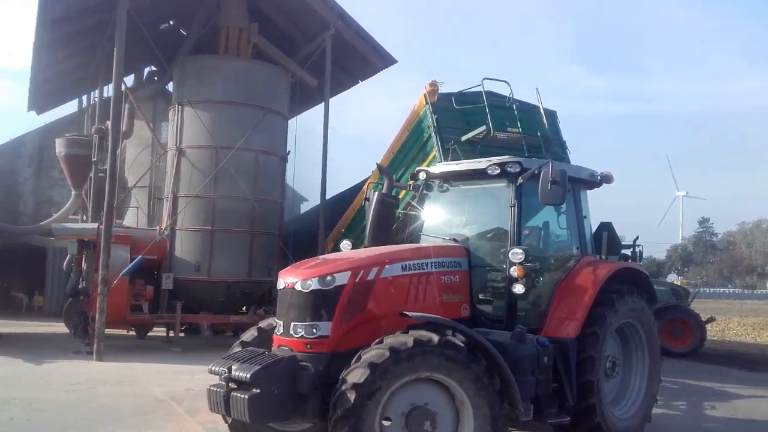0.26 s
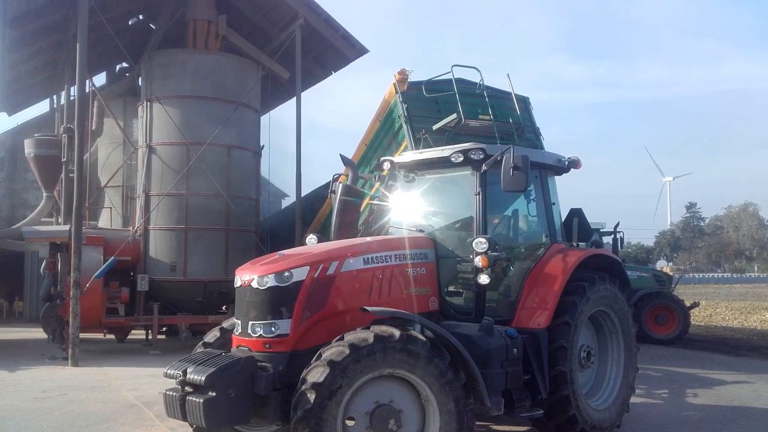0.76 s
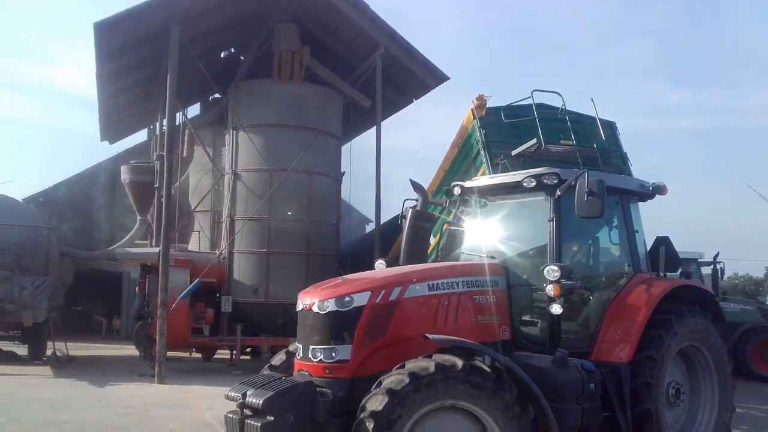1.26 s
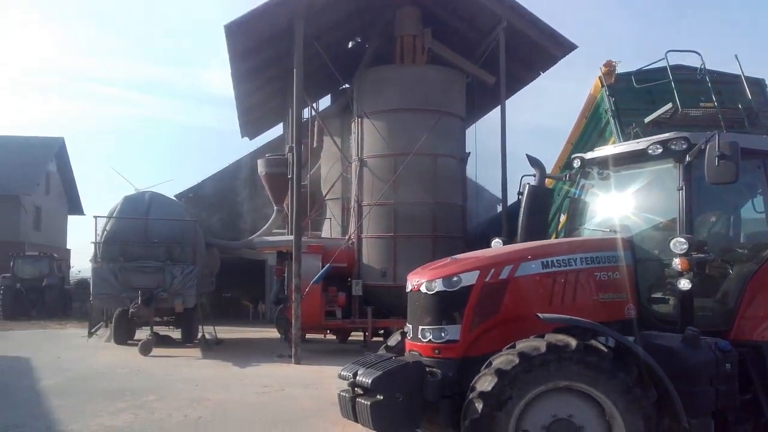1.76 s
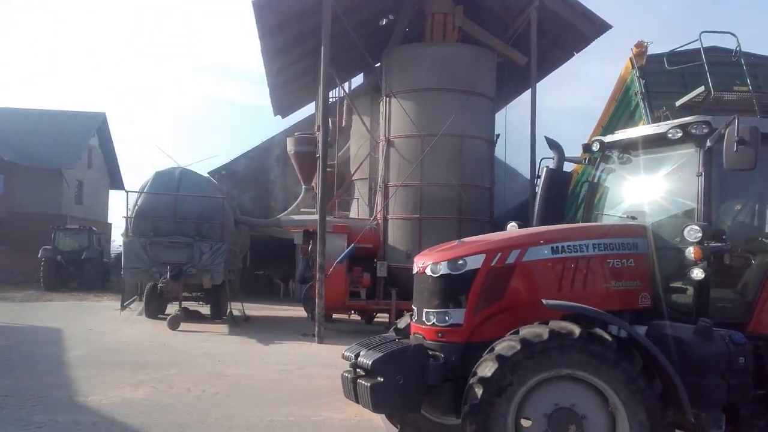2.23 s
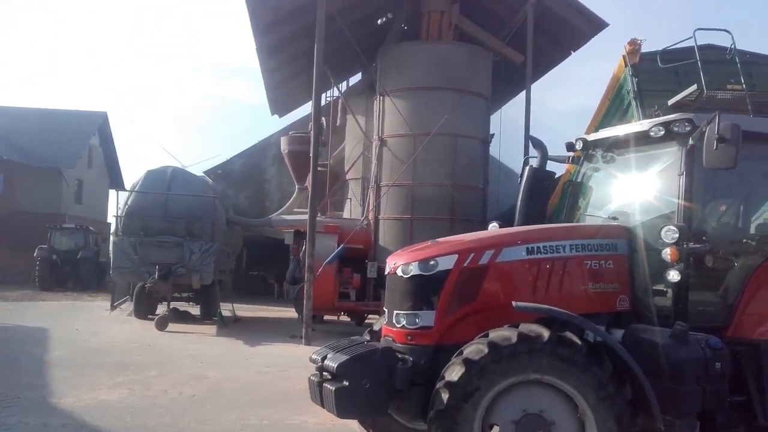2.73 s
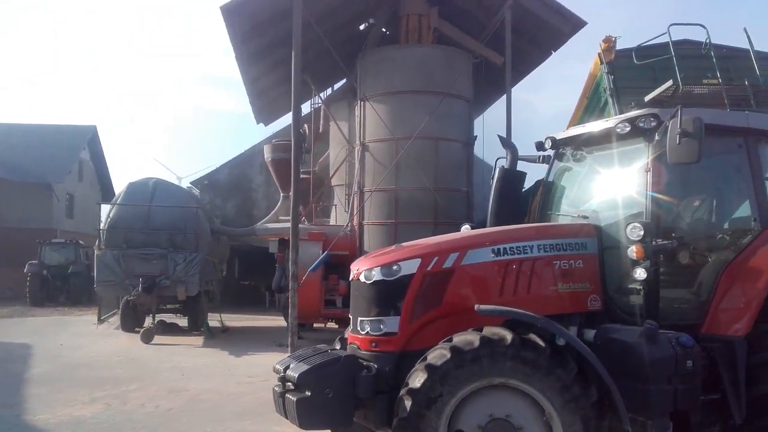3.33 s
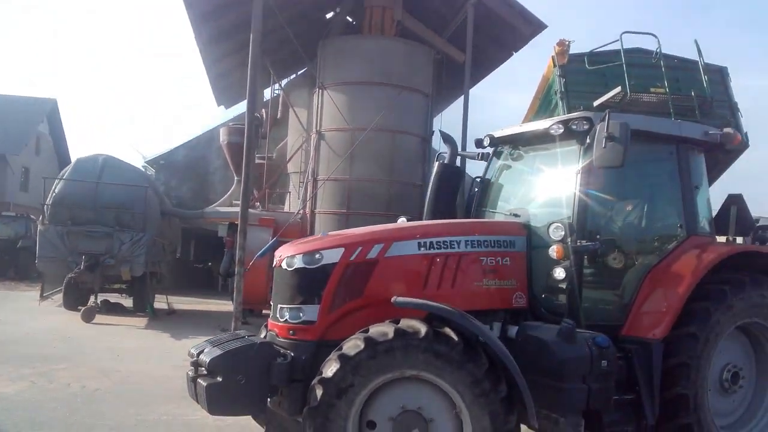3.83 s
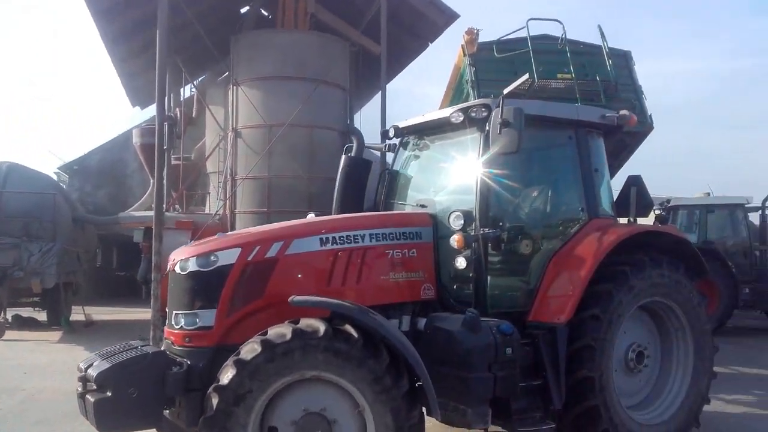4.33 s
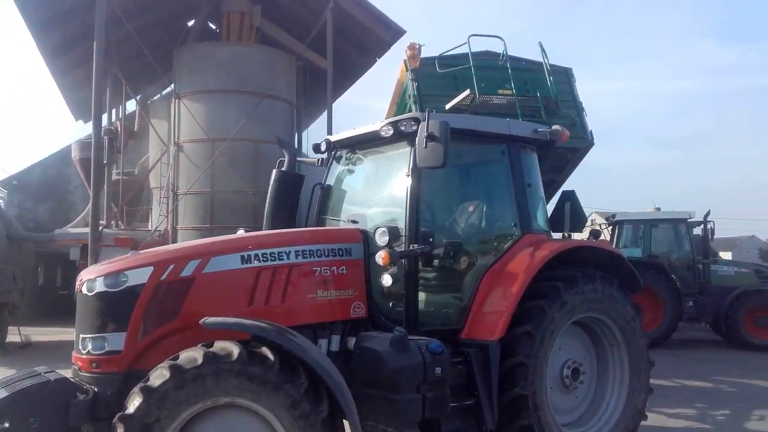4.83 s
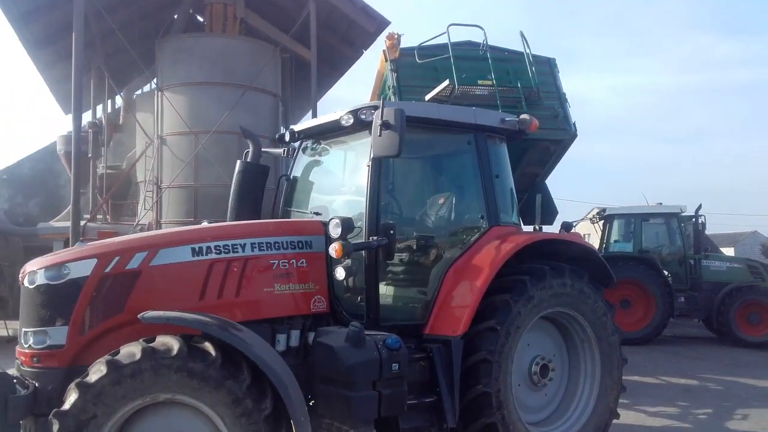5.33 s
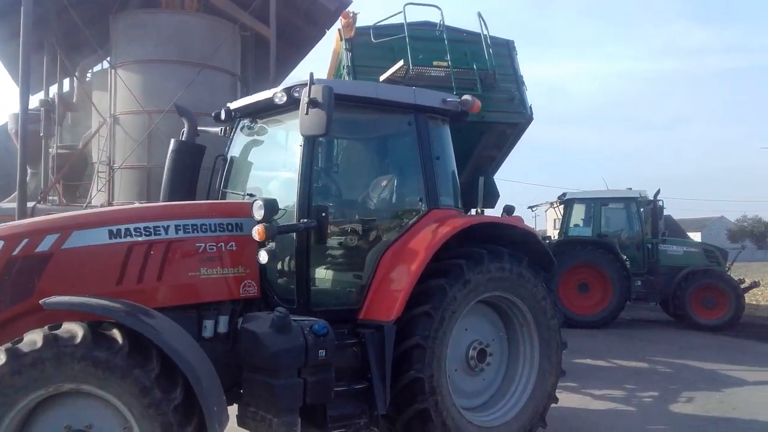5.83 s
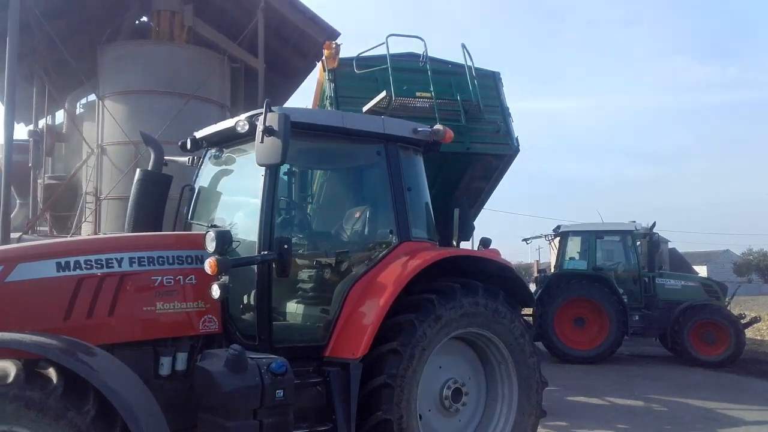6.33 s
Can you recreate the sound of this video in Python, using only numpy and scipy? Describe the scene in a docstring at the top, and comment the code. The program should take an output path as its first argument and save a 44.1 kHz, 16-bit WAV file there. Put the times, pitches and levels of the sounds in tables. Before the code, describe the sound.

Loud, continuous hissing rush from a big drying fan in a farmyard, with a softer roar and faint motor whine underneath.

```python
"""Drying fan in a farmyard

A big fan blows a broad rush of air, with faint blade and motor tones. Eddies make it flutter.
A hand-held phone with one microphone is carried past and swung round. Each way it points colours
the rush differently, as hand, case and nearby sheet metal lift some bands and cancel others."""
import sys
import numpy as np
from scipy import signal
from scipy.fft import rfft, irfft, next_fast_len
from scipy.io import wavfile
from scipy.ndimage import uniform_filter1d, map_coordinates

SR = 44100
rng = np.random.default_rng(int(sys.argv[2]) if len(sys.argv) > 2 else 0)


def digitize_waveform(pressure):
    """Quantize a signal to 16-bit integers and store it at the path in sys.argv[1].

    Rows of a 2-D input are taken as channels; values are limited to [-1, 1].
    """
    field = np.atleast_2d(pressure).T
    bounded = np.clip(field, -1, 1)
    quanta = np.round(bounded * 32767).astype(np.int16)
    wavfile.write(sys.argv[1], SR, quanta)


N = 290619

# The pitches of the blade, motor and hum tones, in Hz.
TONE_PITCHES = [106.3, 131.9, 158.8, 216.7, 293.2, 442.8, 460.3, 581.4, 607, 674.3, 713.3, 905.7, 944.8,
                1742.5]
# The same tones, in order. Each row: level in dB before the bass lift, pitch waver in Hz.
TONE_SETTINGS = [(-63.5, 0.36), (-65.5, 0.49), (-66, 0.52), (-56.5, 0.9), (-58, 0.74), (-66, 0.81),
                 (-61, 0.67), (-45.5, 0.36), (-53, 0.67), (-44.5, 0.65), (-45, 1.19), (-45.5, 0.68),
                 (-47, 0.62), (-39.5, 3.22)]
# How loud the hiss of the air is. Each row: time in seconds, level in dB.
HISS_LEVELS = [(0.0, -14), (0.11, -13.5), (1.65, -13), (1.82, -15), (2.8, -15), (3.1, -13), (4.64, -13),
               (4.73, -14.5), (4.86, -12.5), (5.16, -13.5), (6.0, -13), (6.59, -14)]
# The basic colour of the rushing air. Each row: frequency in Hz, relative level in dB.
AIR_SPECTRUM = [(25, -49), (60, -34), (105, -23.5), (210, -10), (360, -6), (520, -10), (680, -3.5),
                (1050, -0.5), (2300, -3), (4700, -0.5), (9300, -3.5), (12700, -19), (15200, -20),
                (15700, -19)]
# Where the phone points. Each row: time in seconds, heading from 0 (right) to 1 (left).
PHONE_HEADINGS = [(0, .2), (1.05, 0.17), (1.5, 0.58), (1.85, 0.9), (2.8, 0.95), (3.55, .9), (4.15, 0.83),
                  (4.5, 0.61), (4.9, .4), (5.15, 0.044), (5.8, 0.13), (6.59, 0)]
# Bands that hand, case and sheet metal lift or cancel. Each row: centre in Hz, width in Hz,
# then the lift in dB with the phone swung right, halfway and left.
COLOUR_BANDS = [(1200, 150, 5, 5, 3.5), (1416, 203, 4.5, 6, 3.5), (1730, 240, 5.5, 5, 6.5),
                (2028, 214, 4, 5, 7), (2400, 260, -0.8, -0.5, 1.5), (2850, 250, 5.5, 4, 1),
                (3350, 210, 1.5, 2, 3), (3720, 330, -.3, .5, -2.2), (4240, 580, 0, 2, 5.5),
                (5000, 280, 0, 2.5, -2), (5240, 370, 9, 6.5, 0.5), (5580, 306, 6.5, 5.5, 8.5),
                (5880, 278, 7.5, 9.5, 8), (6050, 210, 5.5, 3.5, -1), (6370, 280, 5, 10.5, 7),
                (6630, 240, 2, 3.5, 2), (6945, 330, 2, 9, 9), (7190, 240, -0.5, 0, 5),
                (7450, 330, 4, 2.5, 8), (7870, 240, 0.5, -1, 2.3), (8090, 470, 3.5, 2.5, 5),
                (8860, 740, 2.5, 3.5, -.5), (10660, 930, 1.5, 3.5, 3), (11700, 800, -0.5, 2.5, 0.8),
                (14700, 1200, -2, 3, -.5)]

SPLIT_HZ, TOP_HZ = 2200, 15750  # where roar ends and hiss begins; the phone's upper limit
ROAR_DB, ROAR_FOLLOWS = -21, 0.74  # average roar level; share of the hiss's level changes it follows
BASS_START_DB, BASS_DB_PER_S = -2, 0.85


def amp(db):
    """Turn decibels into a number to multiply by."""
    return 10 ** (np.asarray(db) / 20)


def unit(x):
    """Scale a signal to an average strength (rms) of 1."""
    return x / np.sqrt(np.mean(x ** 2) + 1e-20)


def wobble(rate):
    """A smooth curve through `rate` random points a second."""
    points = rng.standard_normal(int(N * rate / SR) + 4)
    return unit(map_coordinates(points, [np.arange(N) * rate / SR]))


def patches(shape, bins, frames):
    """A random pattern, smoothed across frequency bins and time frames."""
    noise = uniform_filter1d(rng.standard_normal(shape), size=bins, axis=0)
    return unit(uniform_filter1d(noise, size=frames, axis=1))


def filtered(x, response):
    """Scale each frequency in x by response(hz)."""
    size = next_fast_len(N + 8192)
    hz = np.fft.rfftfreq(size, 1 / SR)
    return irfft(rfft(x, size) * response(hz), size)[..., :N]


def bass_lift_db(t):
    """The bass grows as the phone is carried nearer."""
    return BASS_START_DB + BASS_DB_PER_S * t


def blade_and_motor_tones():
    """Faint tones waver in pitch and strength, and all grow with the bass."""
    tones = np.zeros(N)
    for hz, (db, waver_hz) in zip(TONE_PITCHES, TONE_SETTINGS):
        pitch = hz + waver_hz * wobble(4)
        phase = 2 * np.pi * (np.cumsum(pitch) / SR + rng.random())
        tones += amp(db + .9 * wobble(2.58)) * np.sqrt(2) * np.sin(phase)
    return tones * amp(.7 * bass_lift_db(np.arange(N) / SR))


def phone_colour_db(hz, t):
    """Bands rise and fall as the phone turns, and the bass swells as it comes nearer."""
    bands = np.array(COLOUR_BANDS, float)
    centres, widths, lifts = bands[:, 0], bands[:, 1], bands[:, 2:]
    heading = np.interp(t, *np.transpose(PHONE_HEADINGS))
    lift_db = np.array([np.interp(heading, [0, .5, 1], row) for row in lifts])
    bell_curves = np.exp(-2 * ((hz[:, None] - centres) / widths) ** 2)
    bass_share = 1 / (1 + (hz / 170) ** 4)
    return bell_curves @ lift_db + np.outer(bass_share, bass_lift_db(t))


def air_gain(hz):
    """How strong the rushing air is at each frequency."""
    points_hz, db = np.transpose(AIR_SPECTRUM)
    return amp(np.interp(np.log(hz + 1), np.log(points_hz), db))


def roar_and_hiss():
    """Swirling air makes noise, split here into a low roar and a high hiss, each of even strength."""
    framing = dict(nperseg=2048, noverlap=1792)
    hz, t, noise = signal.stft(rng.standard_normal(N), SR, **framing)
    eddies_db = 0.32 * patches(noise.shape, bins=16, frames=30)
    # Echoes off sheds and machines add a fine, slow ripple that fades in the treble.
    echoes_db = 2.0 * patches(noise.shape, bins=2, frames=70) / (1 + hz[:, None] / 5000)
    gain = amp(phone_colour_db(hz, t) + eddies_db + echoes_db)
    parts = []
    for band in (hz < SPLIT_HZ, hz >= SPLIT_HZ):
        power = np.sum((gain * air_gain(hz)[:, None])[band] ** 2, axis=0)
        levelled = noise * gain * band[:, None] / np.sqrt(power)
        _, wave = signal.istft(levelled, SR, **framing)
        parts.append(unit(filtered(wave[:N], air_gain)))
    return parts


def rushing_air():
    """Eddies make the fan's whole stream flutter, the hiss more than the roar."""
    roar, hiss = roar_and_hiss()
    hiss_db = np.interp(np.arange(N) / SR, *np.transpose(HISS_LEVELS))
    roar_db = ROAR_DB + ROAR_FOLLOWS * (hiss_db - hiss_db.mean())
    flutter = .5 * wobble(12) + 0.43 * wobble(35) + 0.52 * wobble(90)
    return amp(hiss_db + 0.72 * flutter) * hiss + amp(roar_db + 0.3 * flutter) * roar


def scene():
    """Air and tones reach one microphone, which feeds both channels."""
    return np.tile(rushing_air() + blade_and_motor_tones(), (2, 1))


def record(dry):
    """The phone clips near full scale and keeps nothing above its upper limit."""
    return filtered(np.clip(dry, -.96, .96), lambda hz: hz < TOP_HZ)


dry = scene()
out = record(dry)
digitize_waveform(out)
```